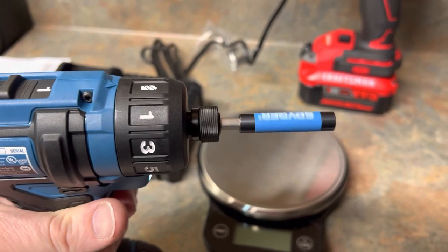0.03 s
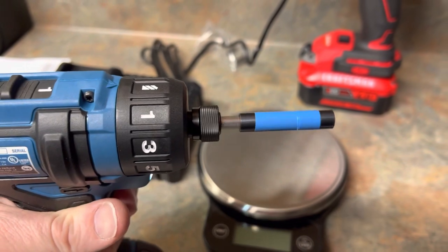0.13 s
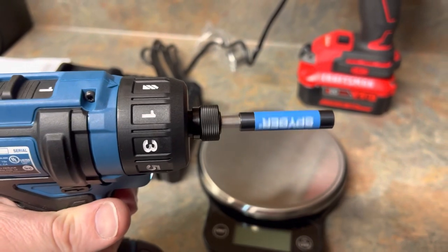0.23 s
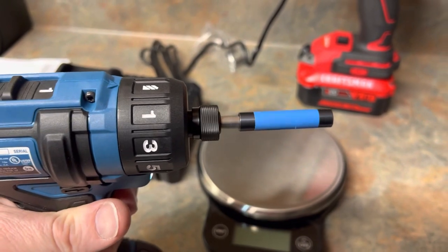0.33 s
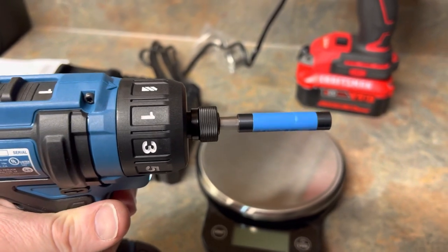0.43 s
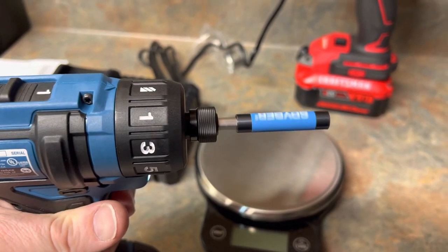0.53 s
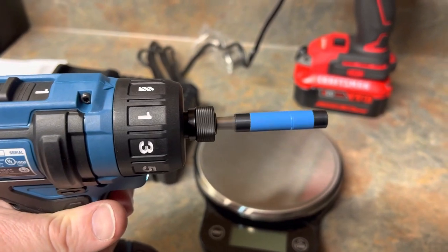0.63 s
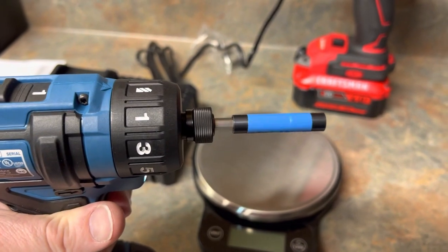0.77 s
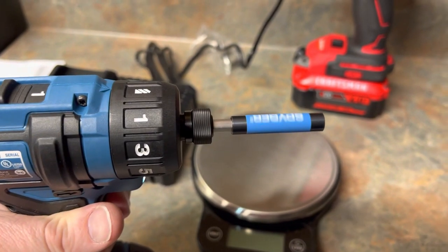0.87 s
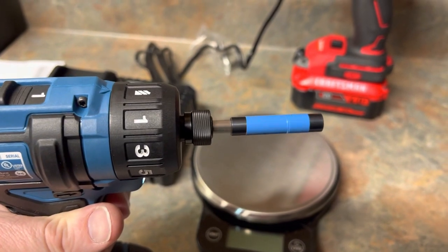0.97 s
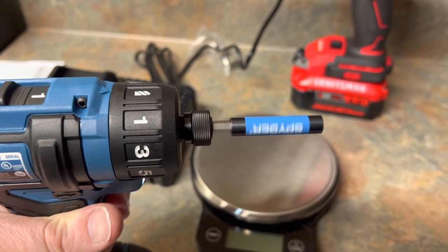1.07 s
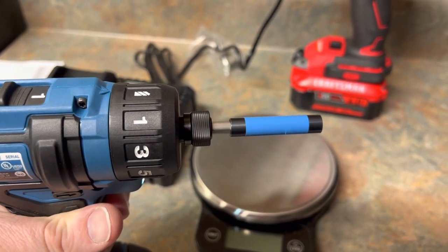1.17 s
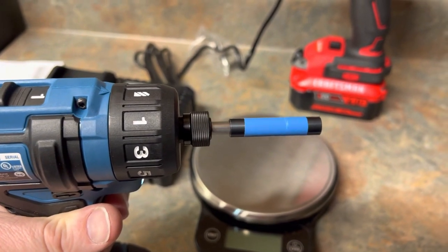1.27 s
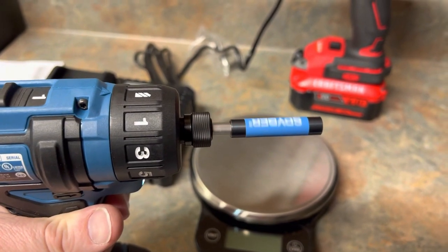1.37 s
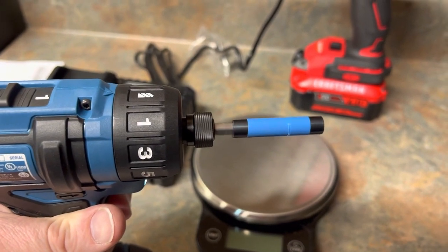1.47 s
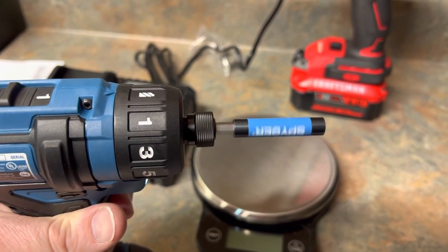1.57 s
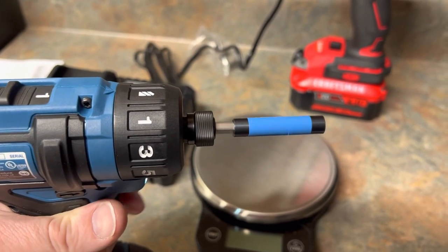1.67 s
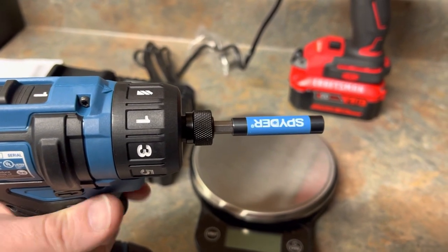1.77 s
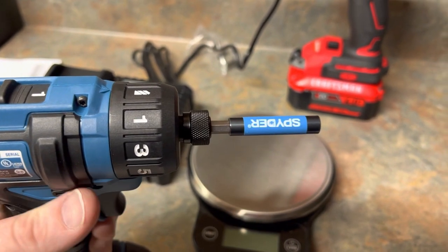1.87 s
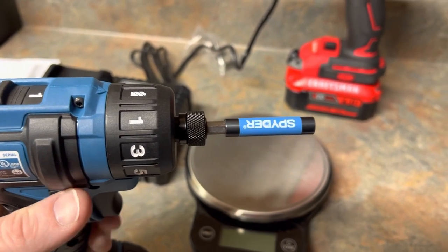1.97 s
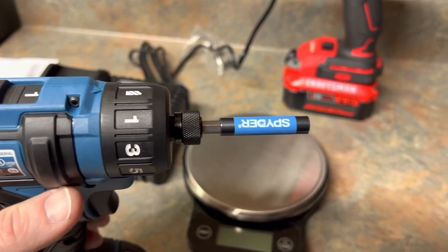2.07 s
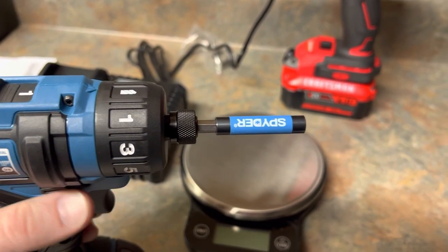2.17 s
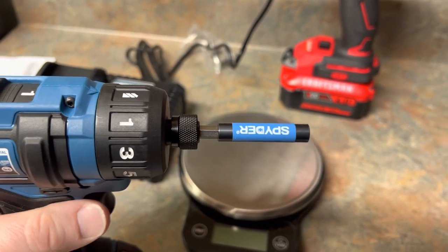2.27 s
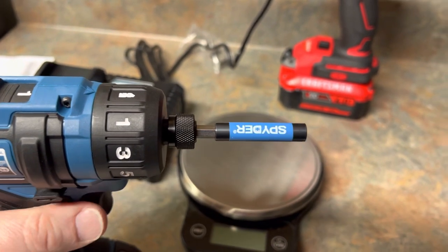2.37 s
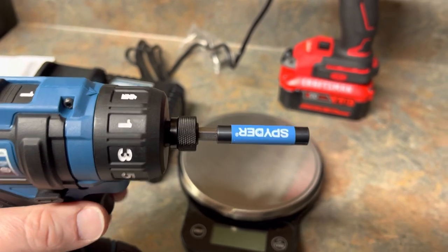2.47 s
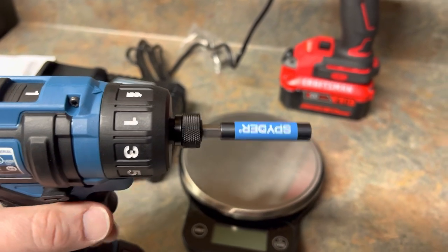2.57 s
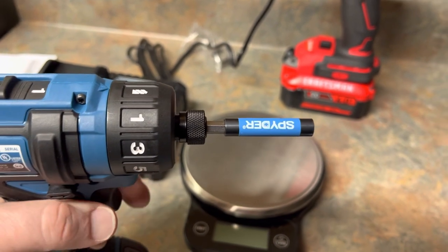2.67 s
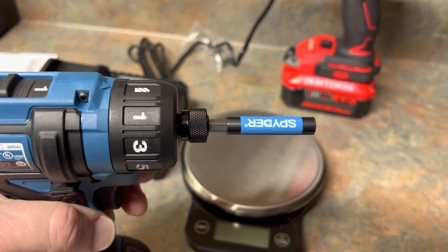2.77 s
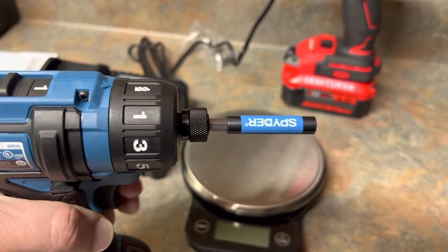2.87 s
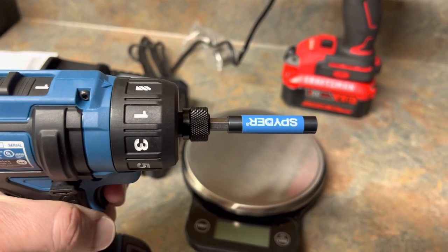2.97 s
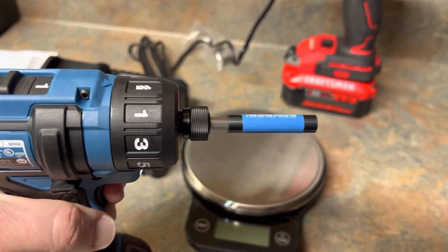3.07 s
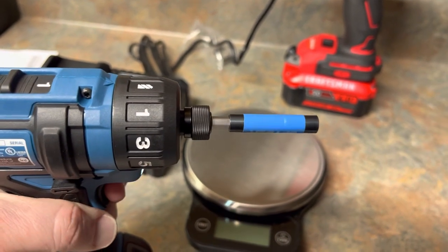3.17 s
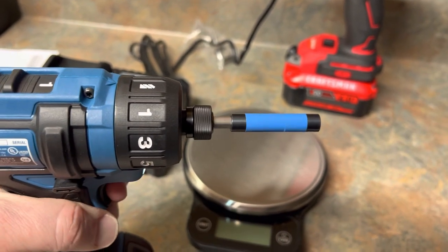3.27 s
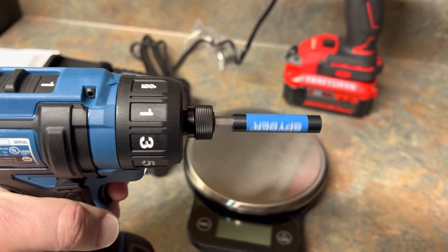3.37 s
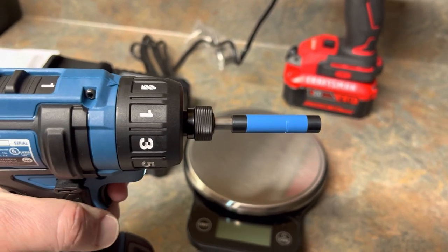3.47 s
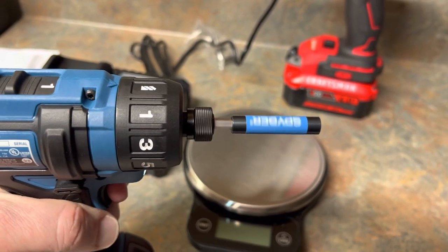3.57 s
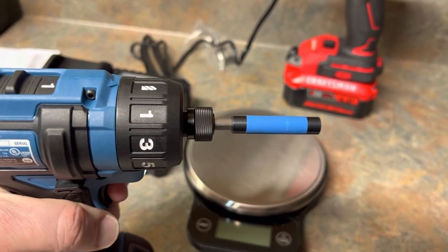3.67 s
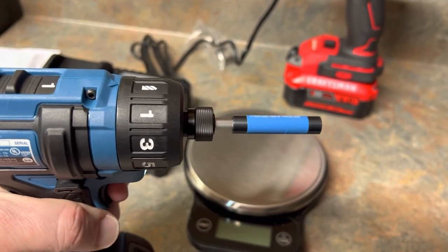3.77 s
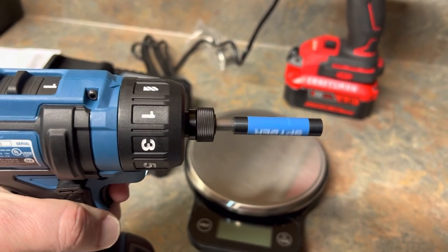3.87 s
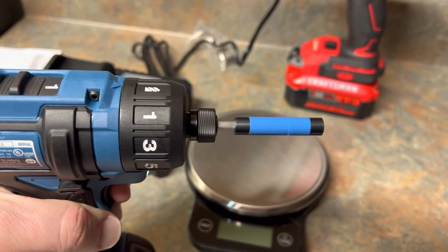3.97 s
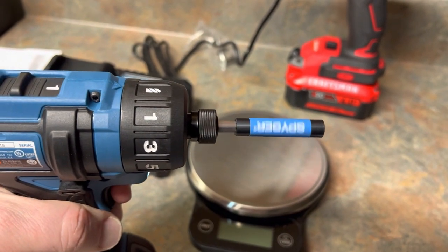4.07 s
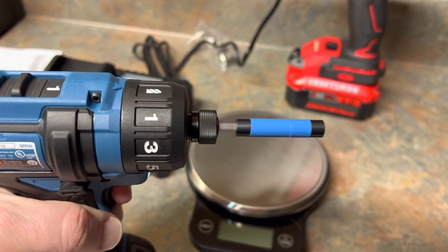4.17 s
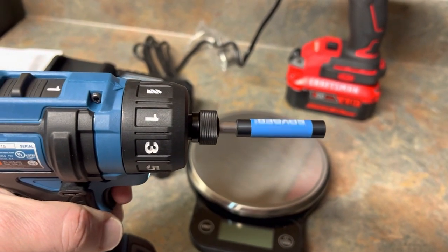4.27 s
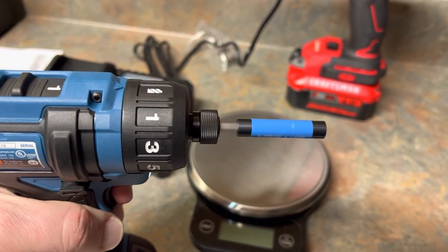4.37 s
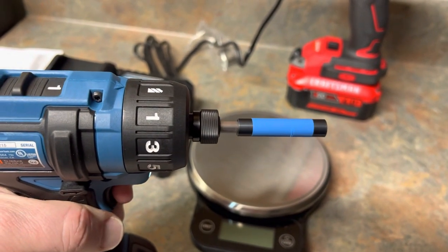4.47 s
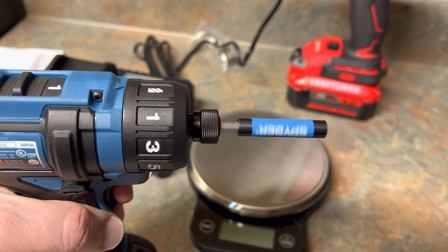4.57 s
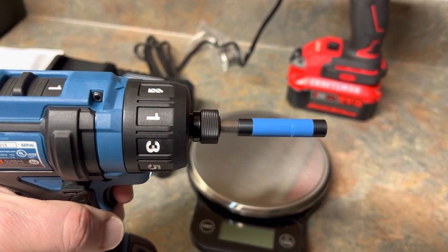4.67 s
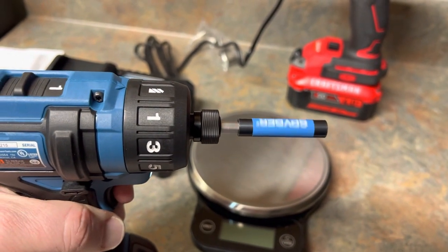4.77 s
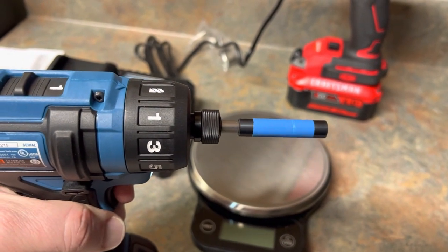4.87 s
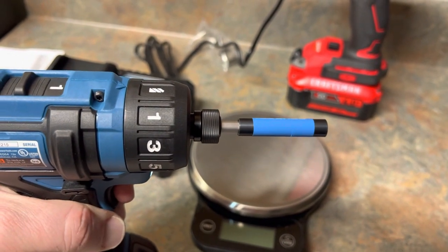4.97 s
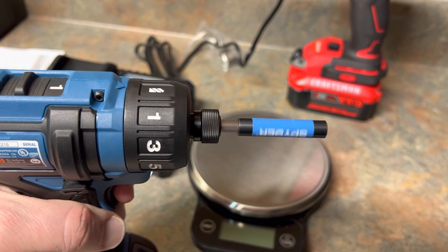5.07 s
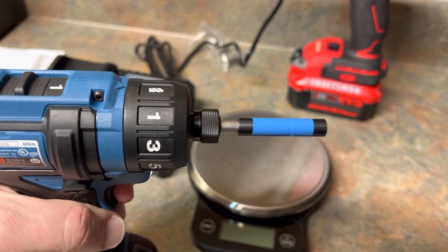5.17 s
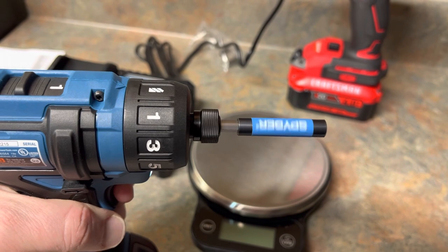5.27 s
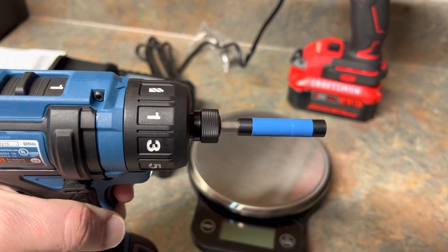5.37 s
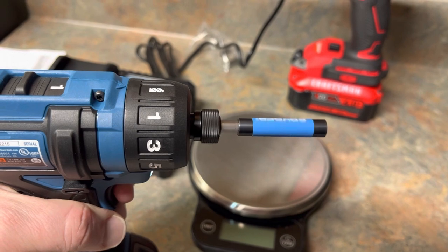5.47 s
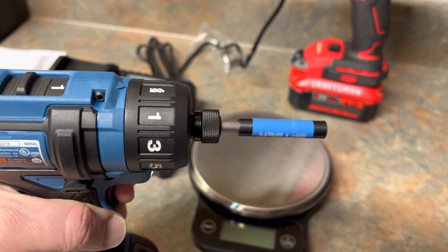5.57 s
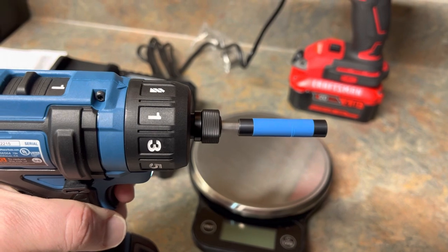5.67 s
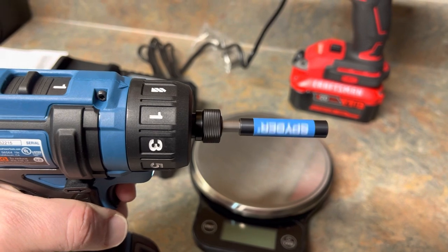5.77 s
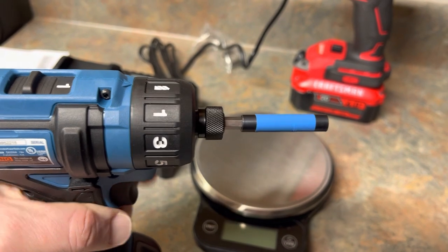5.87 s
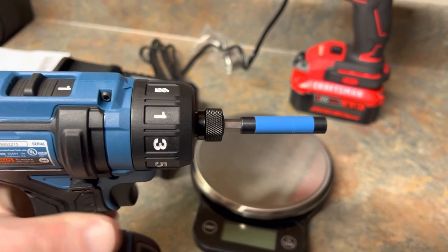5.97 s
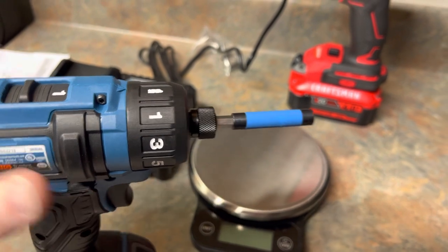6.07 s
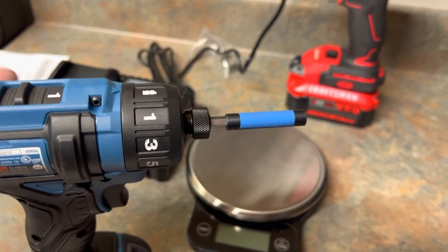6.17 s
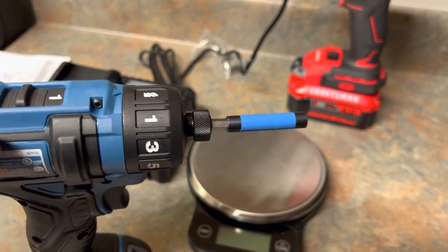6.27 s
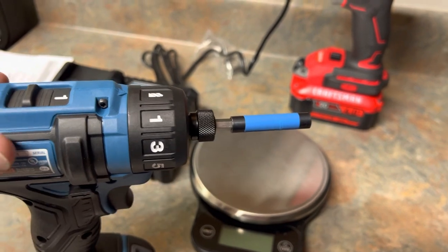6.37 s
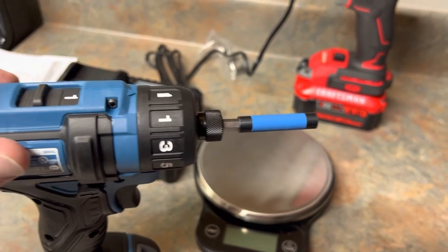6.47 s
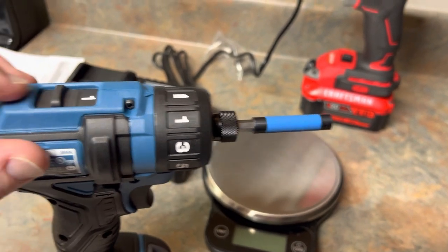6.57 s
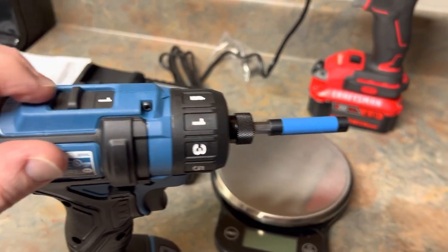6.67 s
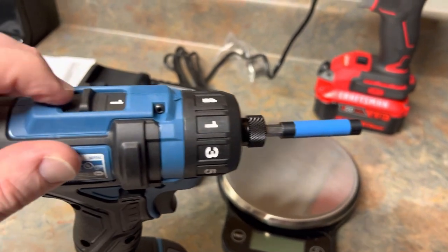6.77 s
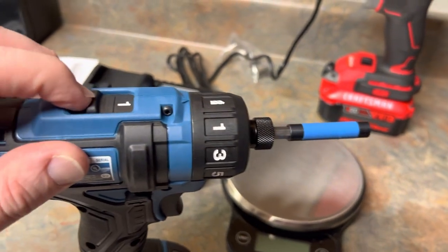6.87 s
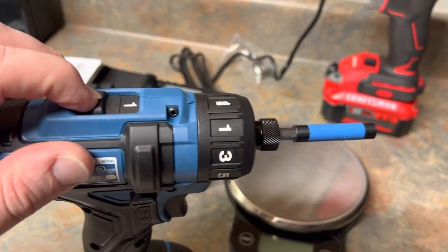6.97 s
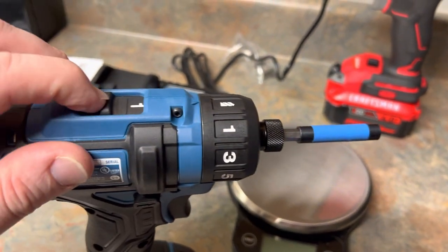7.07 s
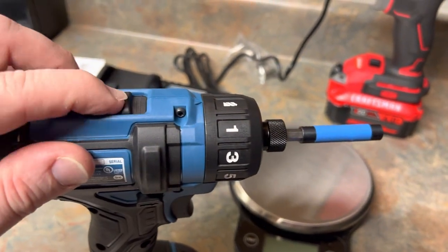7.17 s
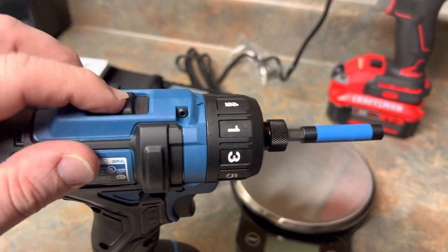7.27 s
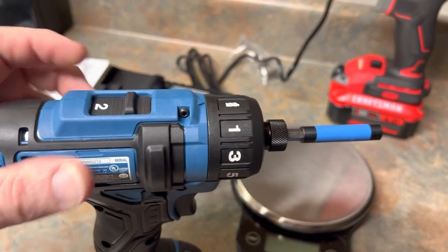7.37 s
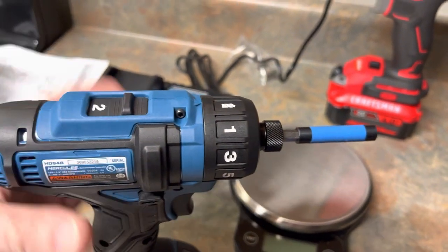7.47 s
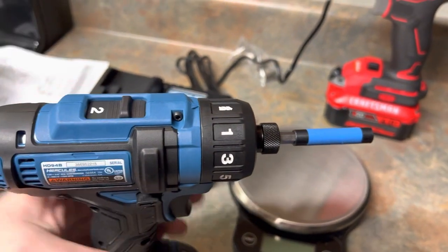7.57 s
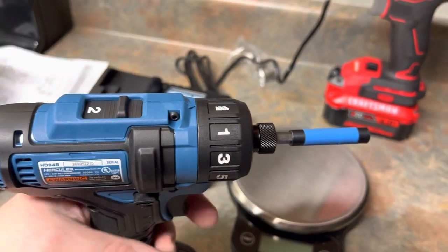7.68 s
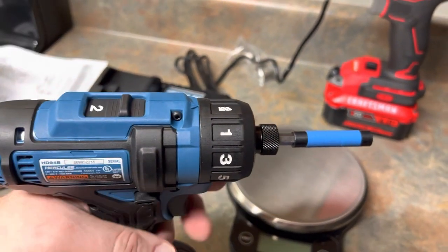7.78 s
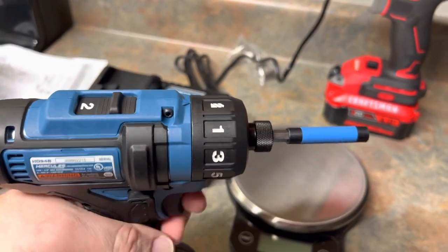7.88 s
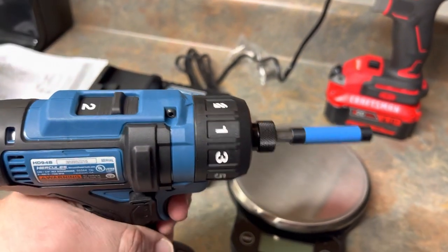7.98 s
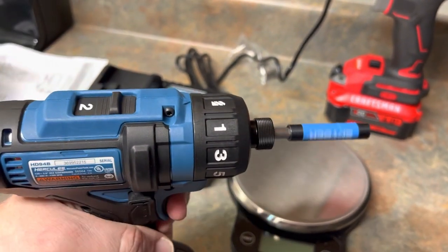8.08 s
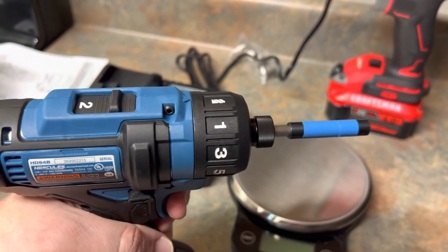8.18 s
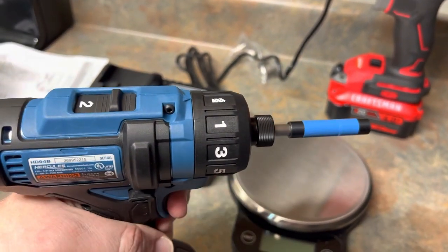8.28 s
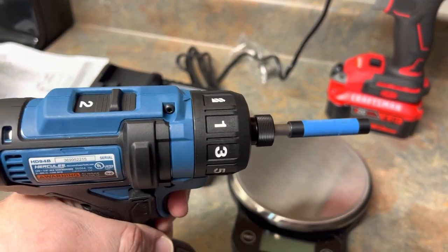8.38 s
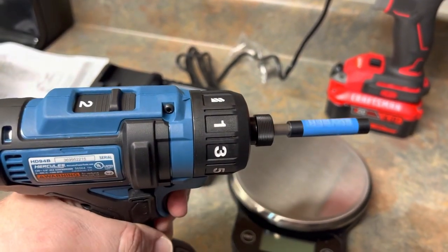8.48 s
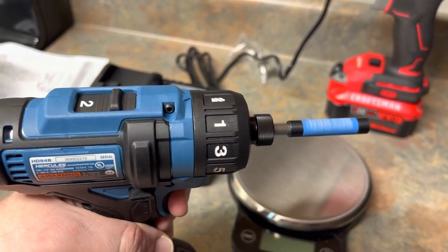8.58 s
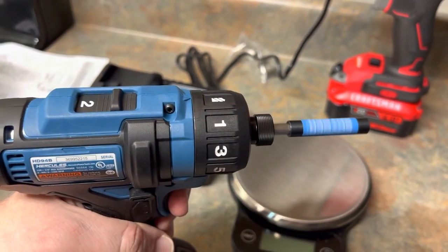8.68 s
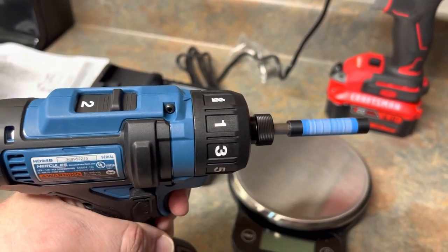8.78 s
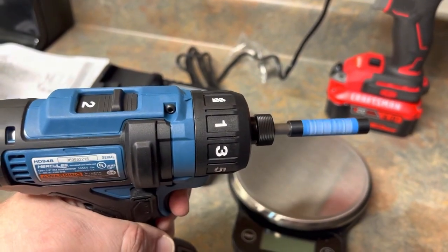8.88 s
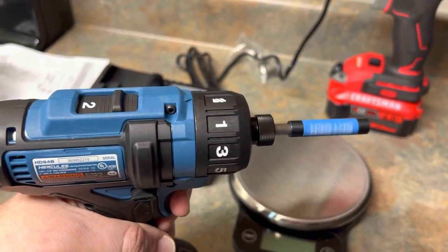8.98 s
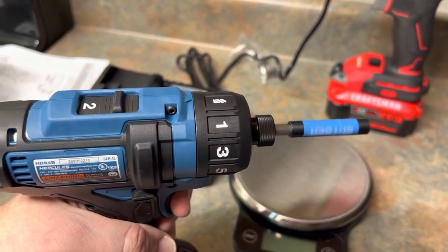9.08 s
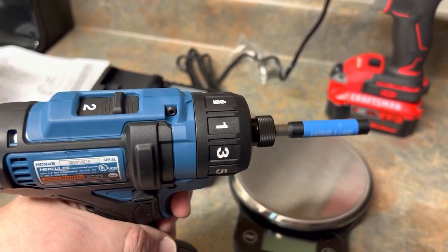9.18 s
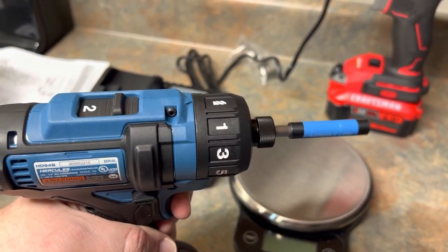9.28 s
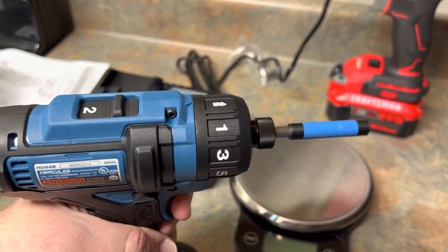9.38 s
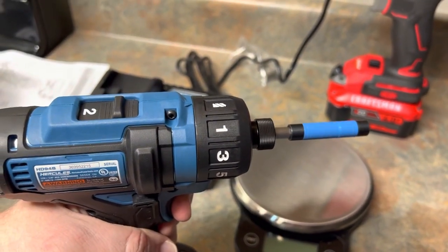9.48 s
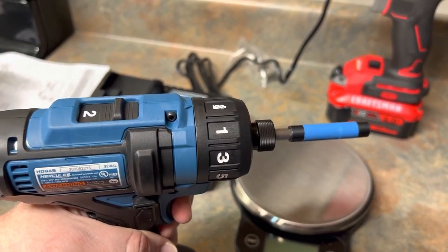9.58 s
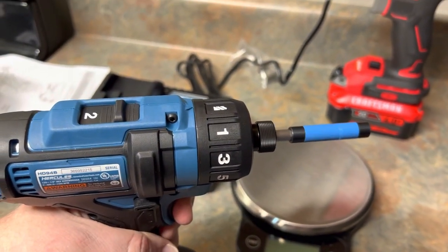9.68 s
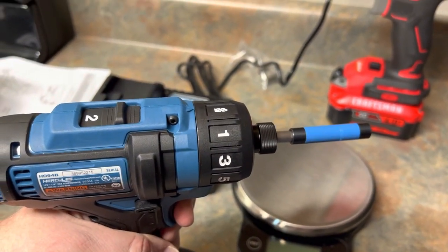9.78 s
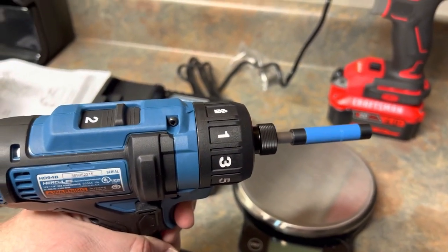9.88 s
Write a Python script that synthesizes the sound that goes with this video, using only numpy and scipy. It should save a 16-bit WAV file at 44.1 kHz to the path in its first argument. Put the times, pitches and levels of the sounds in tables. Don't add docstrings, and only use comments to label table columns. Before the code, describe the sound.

An unloaded cordless drill whirs steadily up close, stops dead with a clunk, and runs twice more between plastic switch clicks in a quiet kitchen.

```python
import sys
import numpy as np
from scipy import signal
from scipy.fft import rfft, irfft, next_fast_len
from scipy.io import wavfile
from scipy.ndimage import uniform_filter1d

SR = 44100
rng = np.random.default_rng(int(sys.argv[2]) if len(sys.argv) > 2 else 0)


def volts(x):
    e = np.asarray(x, float) / 20
    return 10 ** e


def master(y):
    cut = np.clip(np.atleast_2d(y).T, -1, 1)
    pcm = np.round(cut * 32767)
    wavfile.write(sys.argv[1], SR, pcm.astype(np.int16))


N = 437472
SIZE = next_fast_len(N + SR)
HZ = np.maximum(np.arange(SIZE // 2 + 1) * SR / SIZE, 1)

# trigger pulled in seconds, let go in seconds, brake bites in seconds.
TRIGGER = [
    (-.23, 1.624, 1.712),
    (3.001, 5.8, 5.84),
    (8.019, 11, 11.05),
]


def rms_one(x):
    return x / np.sqrt(np.mean(x ** 2) + 1e-20)


def at_hz(points, hz, column=1):
    points = np.array(points)
    return np.interp(np.log(hz), np.log(points[:, 0]), points[:, column])


def drift(rate_hz, count):
    knots_per_s = 400
    knots = rng.standard_normal(int(count / SR * knots_per_s) + 2)
    pole = np.exp(-2 * np.pi * rate_hz / knots_per_s)
    slow = rms_one(signal.filtfilt([1], [1, -pole], knots))
    return np.interp(np.arange(count) / SR * knots_per_s, np.arange(len(slow)), slow)


def peak(x, hz, width_hz):
    r = np.exp(-np.pi * width_hz / SR)
    poles = [1, -2 * r * np.cos(2 * np.pi * hz / SR), r * r]
    return signal.lfilter([(1 - r * r) / 2, 0, (r * r - 1) / 2], poles, x)


def bell(hz, top_hz, width_hz):
    return 1 / (1 + (2 * (hz - top_hz) / width_hz) ** 2)


def swell(t, middle_s, spread_s):
    return np.exp(-.5 * ((t - middle_s) / spread_s) ** 2)


def coloured(x, gain_of_hz):
    hz = np.maximum(np.arange(len(x) // 2 + 1) * SR / len(x), 1)
    return rms_one(irfft(rfft(x) * gain_of_hz(hz), len(x)))


def room_tone():
    # frequency in Hz, level in dB per Hz.
    rumble_colour = [(15, -28), (25, -9.5), (98, -1), (256, -36), (358, -21.5), (418, -31), (1640, -43),
                     (2360, -50), (8800, -59.5), (10500, -60), (12000, -58.5), (15600, -99), (22000, -120)]
    hum_hz, hum_db, rumble_db = 43, -47, -48.5
    hum_level = volts(hum_db + 1.5 * drift(2.5, N)) * np.sqrt(2)
    hum = hum_level * np.sin(2 * np.pi * hum_hz * np.arange(N) / SR)
    rumble = coloured(rng.standard_normal(N), lambda hz: volts(at_hz(rumble_colour, hz)))
    return hum + volts(rumble_db) * rumble


def kitchen(spectrum):
    # frequency in Hz, t60 in seconds.
    decay = [(100, .3), (400, .3), (1500, .36), (4000, .34), (8000, .3), (14000, .2)]
    wall_dull_hz = 8000
    t, white = np.arange(SR) / SR, rfft(rng.standard_normal((2, SR)))
    hz, tail = np.arange(SR // 2 + 1), 0
    for low_hz in 40 * 2. ** np.arange(9):
        t60_s = at_hz(decay, np.sqrt(2) * low_hz)
        band = irfft(white * ((hz >= low_hz) & (hz < 2 * low_hz)), SR)
        tail = tail + band * volts(-60 * t / t60_s) * np.clip(t / 0.0021, 0, 1)
    sides = rfft(tail, SIZE) / np.sqrt(0.12 * SR)
    wide = 1 / (1 + (500 / HZ) ** 2)
    right = sides[0] + wide * (sides[1] - sides[0])
    return spectrum / (1 + (HZ / wall_dull_hz) ** 2) * np.array([sides[0], right])


def hand():
    # middle in seconds, spread in seconds, skin rustle in dB, low fumbling in dB.
    moves = [(1.9, 0.16, -61.5, -56.5), (2.3, 0.076, -71, -57), (2.47, 0.077, -83, -58),
             (2.95, 0.018, -64, -54), (5.97, 0.019, -69, -55), (6.13, 0.054, -83, -42.5),
             (6.36, 0.12, -68.5, -59.5), (6.82, 0.16, -90, -60), (7.11, 0.045, -67.5, -62.5),
             (7.27, 0.055, -74, -71), (7.68, 0.07, -70, -60), (7.88, 0.18, -60, -63),
             (7.97, 0.017, -61, -62)]
    # skin rustle in dB, low fumbling in dB.
    rest_db = (-88, -63.5)
    # start in seconds, length in seconds, level in dB.
    rub_events = [(2.533, 0.048, -56), (2.564, 0.067, -56), (2.716, 0.054, -72), (2.879, 0.11, -49.5),
                  (6.03, 0.08, -56), (6.075, 0.039, -60), (6.348, 0.058, -67), (6.807, 0.074, -64),
                  (7.084, 0.04, -61), (7.097, 0.04, -38), (7.301, 0.19, -62.5), (7.894, 0.1, -54.5)]
    # frequency in Hz, level in dB per Hz.
    skin_colour = [(290, -60.5), (500, -18), (1030, -19.5), (1230, -18.5), (2010, -17.5), (8750, -28),
                   (11000, -30), (13000, -49)]
    palm_dull_hz = 2700

    t = np.arange(N) / SR
    idle = 1.0
    for pull_s, _, brake_s in TRIGGER:
        idle = idle - np.clip((t - pull_s) / .02, 0, 1) * np.clip((brake_s + .1 - t) / .05, 0, 1)
    swells = sum(np.outer(volts(db), swell(t, s, spread_s)) for s, spread_s, *db in moves)
    rustle, fumble = swells + volts(rest_db)[:, None]

    grains = rng.standard_normal(N) * volts(2.2 * drift(60, N))
    skin = coloured(grains, lambda hz: volts(at_hz(skin_colour, hz)))
    palm = signal.sosfilt(signal.butter(4, palm_dull_hz, fs=SR, output="sos"), skin)
    lump_band = signal.butter(4, [60, 200], "band", fs=SR, output="sos")
    lumps = rms_one(signal.sosfilt(lump_band, rng.standard_normal(N)))
    lumps *= fumble * volts(0.92 * drift(8.6, N))
    rubs = np.zeros(N)
    for start_s, length_s, db in rub_events:
        rise = np.clip((t - start_s) / 0.014, 0, 1) ** 2
        fall = np.clip((start_s + length_s - t) / (0.66 * length_s), 0, 1) ** 1.5
        rubs += volts(db) * rise * fall
    return idle * (skin * rubs + palm * rustle * volts(2.0) + lumps)


def pings():
    # start in seconds, frequency in Hz, peak in dB, t60 in seconds.
    panel = [
        (2.272, 870, -44, .05),
        (2.36, 860, -36, .055),
        (2.657, 850, -49, .09),
        (7.29, 1130, -22, .055),
        (7.115, 1420, -28, .08),
    ]
    out, t = np.zeros(N), np.arange(SR // 5) / SR
    for s, hz, db, t60_s in panel:
        level = volts(db - 60 * t / t60_s) * np.clip(t / 0.0012, 0, 1)
        out[round(s * SR):][:len(t)] += level * np.sin(2 * np.pi * hz * t)
    return out


def clicks():
    # start in seconds, ring peak in dB, ring in Hz, crack in dB, thud in dB.
    snaps = [(1.975, -51, 2080, -58, -52), (2.257, -36, 1320, -52, -36), (2.271, -40, 860, -67, -37),
             (2.312, -57, 1990, -70, -52.5), (2.353, -26, 2020, -20, -30), (2.358, -27.5, 564, -70, -43),
             (2.483, -33.5, 540, -74.5, -24.5), (2.53, -50, 480, -80, -36), (2.572, -46, 2300, -51, -37),
             (2.595, -43, 517, -67, -35), (2.657, -47, 850, -83, -43), (2.866, -52.5, 1500, -66, -53.5),
             (2.959, -41.5, 680, -58, -46), (5.862, -33, 500, -70, -22), (6.075, -34, 596, -38, -27.5),
             (6.078, -38, 1950, -54, -43), (6.088, -34, 1500, -57, -37), (6.124, -37, 600, -71, -32.5),
             (6.18, -52, 450, -80, -33), (6.238, -57, 3400, -75, -43), (6.244, -46, 620, -80, -44),
             (6.271, -49, 500, -80, -39), (6.306, -66, 2500, -68, -46), (6.35, -48, 3360, -72, -51),
             (6.367, -55, 4600, -75, -56), (6.394, -53, 3500, -75, -54), (6.4846, -32, 1500, -24, -36.5),
             (6.978, -45.5, 1070, -64, -41), (7.023, -53, 1100, -61, -49), (7.112, -12, 1370, -12, -26.5),
             (7.29, -28.5, 1530, -40.5, -42), (7.842, -47, 605, -75, -36), (7.85, -39, 400, -78, -26.5),
             (7.885, -46, 563, -72, -29), (7.917, -43, 2020, -69, -39), (7.966, -45, 704, -77, -49),
             (7.987, -35, 1800, -45, -32), (7.995, -37, 600, -70, -35), (8.025, -24, 3300, -43, -59)]
    snap_dies_s, blow_dies_s = 0.021, 0.017
    out, t = np.zeros(N + SR), np.arange(SR // 5) / SR
    impulse = t == 0
    high = signal.butter(2, [3200, 11500], "band", fs=SR, output="sos")
    low = signal.butter(3, [50, 200], "band", fs=SR, output="sos")
    for s, ring_db, hz, crack_db, thud_db in snaps:
        hard = np.clip((crack_db + 45) / 25, 0, 1)
        white = rng.standard_normal((3, len(t)))
        white *= np.clip(t / (.001 + .004 * hard ** 4), 0, 1)
        fall_db = -60 * t / snap_dies_s
        crack = signal.sosfilt(high, white[0] * (volts(fall_db) + 0.016 * volts(fall_db / 8)))

        scrape = white[1] * volts(-60 * t / (blow_dies_s * (1.5 + 1.5 * hard)))
        push = impulse * 5 * (1 - hard) + (.8 + .2 * hard) * scrape
        edge_hz = min(hz * (1.8 + 4.6 * hard), 9000)
        push = signal.sosfilt(signal.butter(3, edge_hz, fs=SR, output="sos"), push)
        blow = peak(peak(push, hz, 1.6 * hz), hz, 2.5 * hz)
        shell = 1.1 * peak(push, 580, 180) + 1.5 * peak(push, 1100, 600)
        shell += 2 * peak(blow, 580, 220) + peak(blow, 1000, 200)
        shell += .5 * peak(blow, 2050, 150) + .4 * peak(blow, 2.6 * hz, 600)
        ring = peak(blow, hz, .17 * hz) + .2 * peak(blow, 1.15 * hz, .07 * hz + 150 * hard)
        ring += (.12 + .3 * hard) * shell

        thud = signal.sosfilt(low, impulse * 25.0 + white[2] * volts(-60 * t / 0.3))
        parts = [(crack, crack_db), (ring, ring_db), (thud, thud_db)]
        out[round(s * SR):][:len(t)] += sum(volts(db) * x / np.abs(x).max() for x, db in parts)
    return out[:N]


def jolts():
    # middle in seconds, spread in seconds, level in dB.
    slams = [
        (1.715, 0.012, -11.5),
        (3.064, 0.015, -12),
        (5.852, 0.0064, -17),
        (8.085, 0.024, -15),
    ]
    # frequency in Hz, width in Hz, level in dB.
    modes = [(716, 13, 9.5), (1200, 120, -5.5), (1730, 460, -9), (2080, 93, -2.5), (10500, 14000, -11)]
    # start in seconds, length in seconds,
    # from Hz, to Hz, level in dB.
    glides = [(1.712, .028, 950, 520, -21), (1.73, .04, 240, 160, -29), (2.996, .09, 5070, 4980, -38),
              (3.036, .044, 440, 760, -24), (3.055, .024, 2120, 2040, -23), (1.707, .022, 1600, 2150, -20),
              (1.728, .012, 2050, 1950, -26), (1.712, .012, 1500, 1250, -26),
              (5.833, .013, 1900, 1960, -18), (5.845, .012, 2080, 1950, -18), (3.05, .035, 180, 260, -23),
              (3.045, .03, 1100, 1300, -28), (3.063, .018, 4150, 4100, -28), (5.842, .024, 939, 600, -21),
              (5.845, .05, 280, 143, -31), (8.012, .055, 4990, 5000, -38), (8.05, .036, 300, 680, -28),
              (8.078, .028, 690, 740, -24), (8.062, .018, 1650, 1750, -24), (8.076, .016, 1950, 2200, -24),
              (8.14, .11, 2480, 2620, -29), (8.206, .5, 2600, 2650, -40)]
    t, white = np.arange(N) / SR, rng.standard_normal(N)
    burst = white * sum(volts(db) * swell(t, s, spread_s) for s, spread_s, db in slams)
    out = sum(volts(db + 5.0) * peak(burst, hz, width_hz) for hz, width_hz, db in modes)
    for s, length_s, from_hz, to_hz, db in glides:
        part = np.linspace(0, 1, round(length_s * SR))
        tone = np.sin(2 * np.pi * np.cumsum(from_hz * (to_hz / from_hz) ** part) / SR)
        out[round(s * SR):][:len(part)] += np.sqrt(2) * volts(db) * np.sin(np.pi * part) ** .7 * tone
    return out


def rotor_speed(run, t):
    # under way in seconds, top in Hz, rise in seconds, creep in Hz, creep in seconds.
    spin = [
        (-.22, 360.2, .047, 4.3, .68),
        (3.011, 349.85, .047, 5, .38),
        (8.039, 341, .04, 18.3, .6),
    ]
    coast_hz_per_s, brake_hz_per_s, crawl_hz = 360, 5000, 35
    _, free_s, brake_s = TRIGGER[run]
    start_s, top_hz, rise_s, creep_hz, creep_s = spin[run]
    up = top_hz * (1 - np.exp((start_s - t) / rise_s)) - creep_hz * np.exp((start_s - t) / creep_s)
    down = coast_hz_per_s * np.clip(t - free_s, 0, brake_s - free_s)
    down += brake_hz_per_s * np.maximum(t - brake_s, 0)
    return np.maximum(up - down, crawl_hz)


def effort(run, t):
    # gear grind in dB, magnetic whine in dB, whine drift in dB per s.
    held = [
        (-29, -26, 1.5),
        (-29.5, -23.5, -0.76),
        (-25, -24.2, 0),
    ]
    # middle in seconds, spread in seconds, grind in dB, whine in dB.
    surges = [
        (3.028, .006, -1.5, 17),
        (3.095, 0.025, -3, 3.5),
        (3.155, .02, 0, 0.5),
        (5.849, 0.014, 8, 16.5),
        (8.107, 0.051, -2.5, 2.5),
        (8.347, .02, 0, 1),
    ]
    # time in seconds, level in dB.
    grip = [
        [(0.0, -29), (0.77, -36.5), (1.302, -38), (1.32, -38.5), (1.62, -38), (1.65, -32), (1.7, -31)],
        [(3.11, -18.5), (3.12, -24.5), (3.18, -18.5), (3.34, -17), (3.43, -18.5), (5.7, -20), (5.83, -18)],
        [(8.13, -20.5), (8.234, -18.5), (8.488, -21.5), (8.512, -17), (8.996, -21.5), (9.854, -20),
         (9.92, -23.5)],
    ]
    shake_wait_s, shake_rise_s, shake_wait_db = .075, .03, -27
    onset_db, grind_rise_s, whine_rise_s = -28, .018, .055
    pull_s, _, brake_s = TRIGGER[run]
    grind_db, whine_db, slope_db_per_s = held[run]
    since, braking = t - pull_s, np.maximum(t - brake_s, 0)
    surge = sum(np.outer(db, swell(t, s, spread_s)) for s, spread_s, *db in surges)

    shake = np.interp(t, *np.transpose(grip[run])) - 700 * braking
    shake += shake_wait_db * np.clip(1 - (since - shake_wait_s) / shake_rise_s, 0, 1)
    grind = grind_db + onset_db * np.clip(1 - since / grind_rise_s, 0, 1) - 376.5 * braking
    whine = whine_db + slope_db_per_s * since - 806 * braking
    whine += onset_db * np.clip(1 - since / whine_rise_s, 0, 1)
    return shake, grind + surge[0], whine + surge[1]


def gears(run, turns, grind_db, whine_db, gate, rattle_db):
    # frequency in Hz, level in dB per Hz in run 1, 2, 3.
    colour = [(60, -74.5, -69.5, -79), (121, -74.5, -73.5, -76), (230, -74.5, -74, -67),
              (540, -69, -68, -64.5), (900, -67.5, -67.5, -65.5), (1370, -66.5, -66, -65),
              (2120, -63.5, -65.5, -63.5), (2540, -71, -70.5, -64.5), (3500, -70, -72.5, -72),
              (4300, -70, -73, -72), (6000, -67.5, -69.5, -65), (8260, -66.5, -67, -61.5),
              (9600, -69.5, -67.5, -61.5), (10600, -72.5, -71.5, -67.5), (11100, -62.5, -62, -62),
              (12300, -65.5, -69, -62.5), (13450, -74, -75, -69), (14800, -71.5, -78, -73.5),
              (15700, -85.5, -79.5, -71.5)]
    # frequency in Hz, width in Hz, dB above the colour in run 1, 2, 3.
    resonances = [(190, 7, 16, 10.5, 8), (88.6, 7.8, 15, 11, 25.1), (547, 38, 3.5, 2.5, 1.8),
                  (450, 23, 2.5, 4, 0.96), (1020, 130, 0.5, 0, 0.79), (1197, 78, 2, 4, 1.4),
                  (1710, 120, 4, 3, 9.9), (2044, 110, 5, 9.5, 5.7), (2600, 160, 5.5, -1.5, 0.37),
                  (4067, 130, 4.5, 10.5, 0.76), (4790, 40, 9, 10, 10.5), (8400, 500, -6.5, -4.5, 2.5)]
    # frequency in Hz, width in Hz, level in
    # dB.
    hollows = [(416, 29, -13.5), (795, 37, -10), (1500, 180, -3.5), (3630, 360, -1), (5240, 350, 1.5)]

    def housing(hz):
        lift = sum(volts(db[run]) ** 2 * bell(hz, top_hz, width_hz) for top_hz, width_hz, *db in resonances)
        hollow_db = sum(db * bell(hz, at, width_hz) for at, width_hz, db in hollows)
        return volts(at_hz(colour, hz, column=run + 1)) * np.sqrt(1 + lift) * volts(hollow_db)

    beat = (1 + gate * np.cos(turns)) * volts(rattle_db * drift(23, len(turns)))
    draws = np.array([coloured(beat * white, housing) for white in rng.standard_normal((2, len(turns)))])
    low = signal.sosfilt(signal.butter(2, 6000, fs=SR, output="sos"), draws)
    high_db = whine_db - np.median(whine_db - grind_db) + 0.5
    return low * volts(grind_db + 5.0) + (draws - low) * volts(high_db)


def rotor(run, speed, shake_db, grind_db, whine_db, wander_db, blur):
    # multiple of rotor speed, dB rms in run 1, 2, 3.
    shaft_tones = [(1, -36.5, -21.5, -24.0), (2, -32.5, -33.5, -35.0), (3, -34.0, -36.0, -44.5),
                   (4, -40.0, -43.5, -54.5), (5, -43.5, -47.5, -44.0), (6, -40.0, -36.0, -34.5),
                   (7, -54.5, -58.0, -50.0), (8, -45.0, -45.5, -47.5), (9, -50.5, -49.0, -42.0),
                   (10, -56.5, -58.0, -50.0), (11, -47.5, -55.5, -58.0), (12, -54.0, -47.5, -52.5),
                   (13, -48.5, -55.0, -58.0)]
    # multiple of rotor speed, dB rms in run 1, 2, 3.
    whine_tones = [(14, -52.0, -50.5, -47.5), (15, -44.5, -42.0, -46.5), (16, -49.0, -55.0, -54.5),
                   (17, -58.0, -54.5, -48.0), (18, -36.0, -43.5, -41.0), (19, -46.0, -47.5, -41.0),
                   (20, -47.5, -55.5, -47.0), (21, -47.5, -44.5, -41.0), (22, -45.5, -40.5, -40.5),
                   (23, -44.5, -43.0, -58.0), (24, -41.0, -41.5, -51.0), (25, -41.0, -39.5, -46.5),
                   (26, -43.5, -48.0, -43.0), (27, -37.0, -38.5, -48.5), (28, -56.5, -42.5, -43.0),
                   (29, -51.5, -49.5, -45.5),
                   (30, -24.0, -37.0, -45.5), (31, -34.5, -38.0, -35.0), (32, -43.5, -39.5, -35.5),
                  (33, -28.5, -38.0, -29.5), (34, -39.0, -38.5, -35.5), (35, -51.0, -41.5, -32.0),
                  (36, -40.5, -35.5, -34.0), (37, -42.0, -46.0, -38.5), (38, -48.0, -47.0, -38.5),
                  (39, -41.5, -57.0, -45.0), (40, -43.0, -50.5, -43.0), (41, -56.5, -49.5, -43.0),
                  (42, -52.0, -46.0, -44.5), (43, -50.0, -47.0, -42.5), (44, -58.0, -53.0, -37.5),
                  (45, -58.0, -46.0, -55.0), (46, -58.0, -58.0, -48.0)]
    # multiple of rotor speed, dB rms in run 1, 2, 3.
    mesh_tones = [(1.755, -54, -46, -45), (3.53, -56, -56, -45), (5.5, -44, -56, -56),
                  (5.81, -44, -46, -41), (6.065, -48, -42, -46), (7.81, -56, -56, -46),
                  (8.065, -44, -45, -48), (16.86, -56, -48, -56), (17.87, -56, -56, -45)]
    # frequency in Hz, level in dB.
    rocking = [(184, -36), (179, -42.5), (176.3, -44)]
    # first multiple in dB, whine in dB.
    tone_offset_db = [(0.01, 0), (0.01, 0), (0.01, -0.8)]
    pulling = [(24, 36), (19, 21, 24), (24, 25, 26, 27)]

    count = len(speed)
    turns = 2 * np.pi * np.cumsum(speed * (1 + blur * drift(25, count))) / SR
    part_speed = speed / speed.max()
    slope = np.gradient(speed)
    change_hz_per_s = np.abs(uniform_filter1d(slope * SR, size=900))
    slip_db = -np.minimum(0.018 * np.maximum(change_hz_per_s - 280, 0), 25)
    slip_db -= 7 * uniform_filter1d(1. * (slope < 0), size=2000)
    load_db = np.clip(250 * (1 - part_speed), 0, 4.5) * (np.arange(count) < speed.argmax())
    grind_change_db = grind_db - np.median(grind_db)

    first_db, lift_db = tone_offset_db[run]
    rock_hz, rock_db = rocking[run]
    rock_phase = 2 * np.pi * np.cumsum(rock_hz * (1 + 0.015 * drift(10.0, count))) / SR
    rock_level = volts(rock_db + grind_change_db + 1.0 * drift(8, count))
    out = rock_level * np.sin(rock_phase) * part_speed ** 2

    for order, *db in shaft_tones + whine_tones:
        if db[run] <= -57:
            continue
        wander = wander_db * drift(2.9, count)
        if order == 1:
            drive_db, trim_db = shake_db, first_db
            wander *= .3
        elif order < 14:
            drive_db, trim_db = grind_db, 40 * np.log10(part_speed)
        elif order in pulling[run]:
            drive_db, trim_db = whine_db, lift_db + .6 * slip_db + 2 * load_db
        else:
            drive_db, trim_db = whine_db, lift_db + slip_db + .5 * load_db
        phase = rng.uniform(0, 2 * np.pi) * (order > 3)
        level = volts(db[run] + drive_db - np.median(drive_db) + trim_db + wander)
        out += level * np.cos(np.round(order) * turns + phase)

    mesh_wander = wander_db * drift(2.9, count)
    for ratio, *db in mesh_tones:
        level = volts(db[run] + grind_change_db + slip_db + 2 * mesh_wander)
        out += level * np.cos(ratio * turns)
    return np.sqrt(2) * out, turns


def drill():
    run_out_s = .07
    direct, twin, song = jolts(), np.zeros(N), np.zeros(N)
    for run, (pull_s, _, brake_s) in enumerate(TRIGGER):
        end_s = brake_s + run_out_s
        span = np.arange(max(round(pull_s * SR), 0), min(round(end_s * SR), N))
        t = span / SR
        shake, grind, whine = effort(run, t)
        tones, turns = rotor(run, rotor_speed(run, t), shake, grind, whine, wander_db=1.9, blur=.00025)
        noise = gears(run, turns, grind, whine, gate=.08, rattle_db=.9)
        fade = np.clip((end_s - t) / .02, 0, 1)
        direct[span] += noise[0] * fade
        twin[span] += noise[1] * fade
        song[span] += tones * fade
    return direct, twin, song


def scene():
    # frequency in Hz, lead of the left in radians.
    lead = [(100, 0), (350, -.2), (750, -.3), (1200, 0), (1500, 1), (2200, 0), (4500, -.2), (5300, -1.9),
            (6000, -.8), (7000, -1.1), (8700, 0), (10500, 3.14), (12200, 6.28), (13900, 9.42),
            (15500, 12.56), (16500, 13.2)]
    # frequency in Hz, likeness 0-1.
    likeness = [(100, .99), (1000, .95), (2500, .92), (4000, .85), (5500, .55), (7000, .75), (9000, .95),
                (10600, .998), (15000, .97)]
    # frequency in Hz, left minus right in dB.
    tilt = [(60, 1.5), (120, 0.5), (240, 1.2), (480, -.5), (950, -1.5), (1890, -0.5), (3770, -3),
            (7520, -2.5), (15000, 1.5)]
    wet_db, tone_wet_db = -0.5, -15
    direct, twin, song = drill()
    near = rfft(direct + clicks() + pings() + hand(), SIZE)
    other, tones = rfft(twin, SIZE), rfft(song, SIZE)
    side = np.array([[.5], [-.5]])
    apart = np.sqrt(1 - np.clip(at_hz(likeness, HZ), 0, 1))
    ports = volts(side * at_hz(tilt, HZ)) * np.exp(1j * side * at_hz(lead, HZ))
    noise = (near + 2 * side * apart * other) / np.sqrt(1 + apart ** 2)
    heard = ports * (noise + tones)
    heard += volts(wet_db) * kitchen(near + volts(tone_wet_db) * tones)
    return irfft(heard, SIZE)[:, :N] + room_tone()


def band_limit(x):
    return signal.sosfilt(signal.butter(12, 17100, fs=SR, output="sos"), x)


def record(dry):
    cut = signal.sosfilt(signal.butter(6, 37, "high", fs=SR, output="sos"), dry)
    cut = signal.sosfilt(signal.ellip(10, .5, 70, 15800, fs=SR, output="sos"), cut)
    return band_limit(cut)


dry = scene()
out = record(dry)
master(out)
```